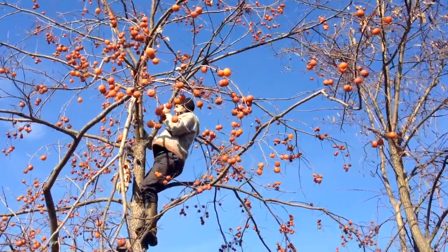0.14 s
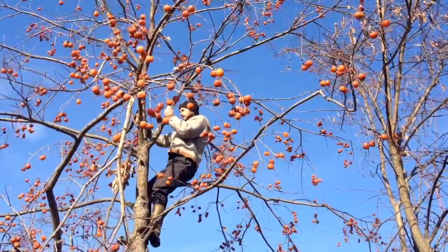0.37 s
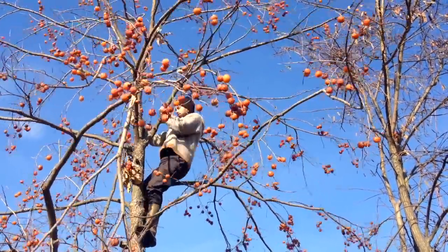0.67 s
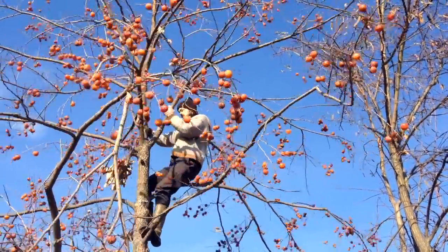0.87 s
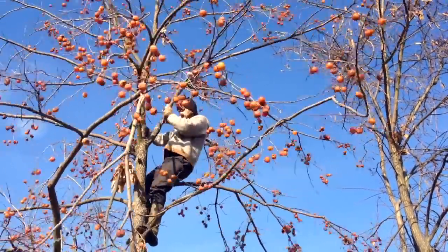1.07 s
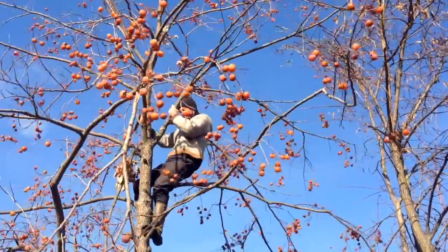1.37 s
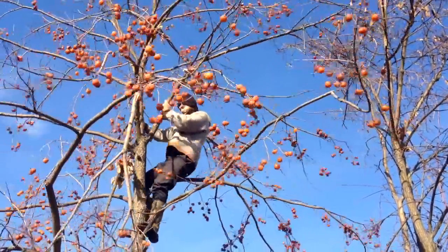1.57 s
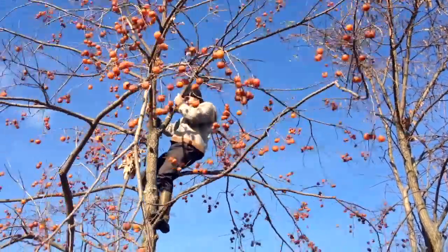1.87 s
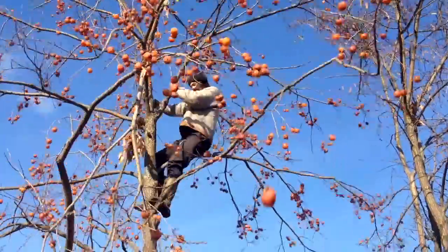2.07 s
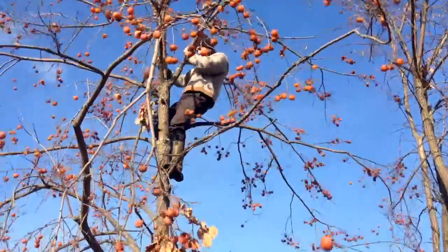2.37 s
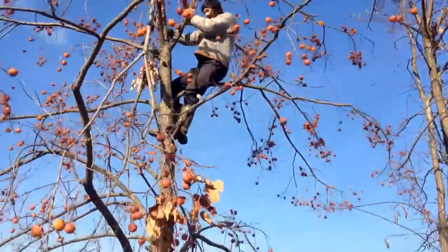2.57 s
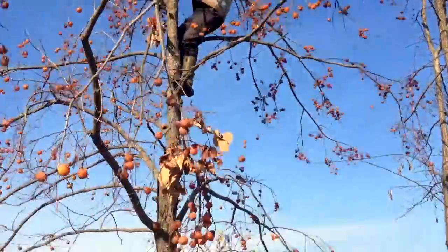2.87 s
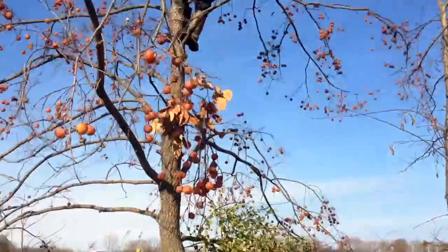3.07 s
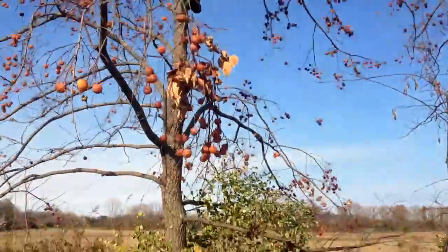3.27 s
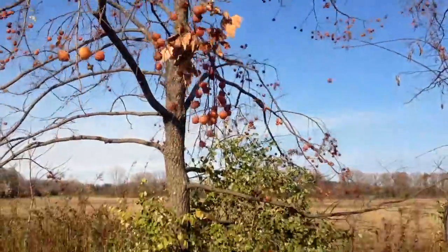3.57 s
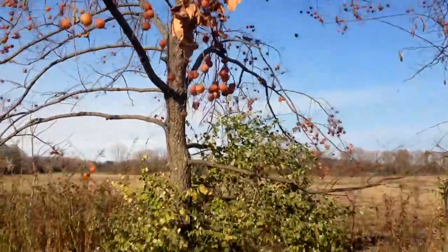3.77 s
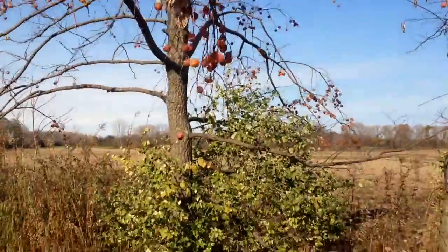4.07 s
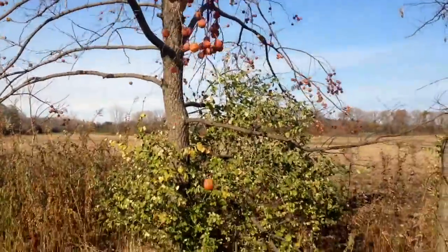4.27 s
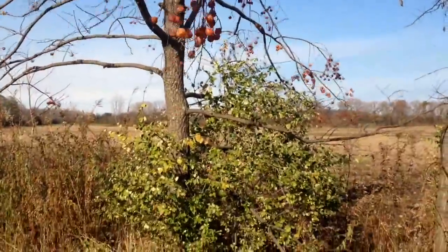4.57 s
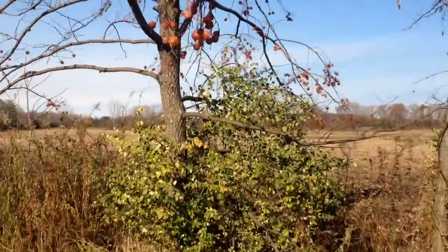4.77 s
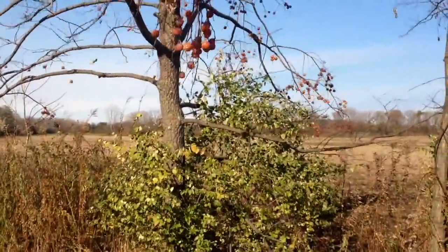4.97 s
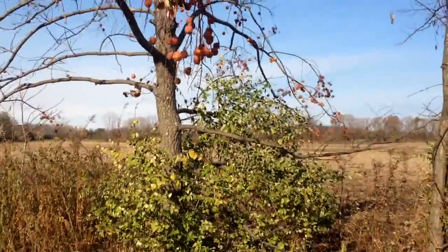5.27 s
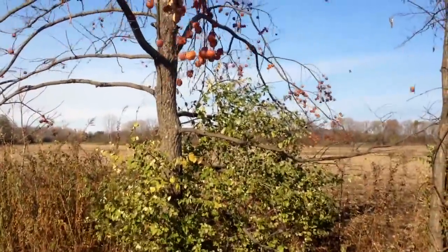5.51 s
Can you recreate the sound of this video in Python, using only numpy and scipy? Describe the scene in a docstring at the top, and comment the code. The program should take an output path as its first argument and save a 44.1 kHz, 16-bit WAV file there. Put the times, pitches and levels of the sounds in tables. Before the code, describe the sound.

Outdoors on open farmland, a faint low breeze, then a climber shakes a fruit tree: dry leaves rustle and twigs snap. From about two seconds fruit falls thickly, with crisp crunches in brittle leaf litter, soft thuds on soil and a few woody knocks on branches. Near the end one fruit bounces on something hollow, which rings low and rattles. Single close microphone, mono, dry, no echo.

```python
"""Shaking a fruit tree

Leaves rustle as a flutter of tiny random snaps, over a low breeze made of filtered noise.
Dry twigs snap and falling fruit crunches into brittle litter: short bursts of the same kind of snaps.
Low thumps (short sinking tones) are first a boot on the trunk or a puff of wind, later fruit on soil.
Bark scrapes (rough sliding tones) and branches ring (fading tones). Near the end one fruit bounces
on something hollow, which rings in low tones and rattles."""
import sys
import numpy as np
from scipy import signal
from scipy.fft import rfft, irfft, next_fast_len
from scipy.io import wavfile
from scipy.ndimage import uniform_filter1d, map_coordinates

SR = 44100
rng = np.random.default_rng(int(sys.argv[2]) if len(sys.argv) > 2 else 0)


def dump_mix(stems):
    """Bounce the given channels to the path in sys.argv[1] as a 16-bit WAV at rate SR."""
    frames = np.atleast_2d(stems).T  # one column per channel
    limited = np.clip(frames, -1, 1)  # hard clip at full scale
    pcm = np.round(limited * 32767).astype(np.int16)
    wavfile.write(sys.argv[1], SR, pcm)


N = 248801


def amp(db):
    """Turn decibels into a gain."""
    return 10 ** (np.asarray(db) / 20)


def unit(x):
    """Scale a sound to an rms level of 1."""
    return x / np.sqrt(np.mean(x ** 2) + 1e-20)


def curves(rows):
    """Join table points with straight lines: one curve for each column after the time."""
    s, *cols = np.transpose(rows)
    return [np.interp(np.arange(N) / SR, s, c) for c in cols]


def wobble(rate):
    """Draw a smooth random curve with this many random points a second."""
    points = rng.standard_normal(int(N * rate / SR) + 4)
    return map_coordinates(points, [np.arange(N) * rate / SR])


def filtered(x, response):
    """Multiply the spectrum of x by a response that depends on frequency."""
    m = next_fast_len(N + SR // 2)
    return irfft(rfft(x, m) * response(np.fft.rfftfreq(m, 1 / SR)), m)[..., :N]


def coloured(x, points):
    """Give x the tone colour of (f/Hz, gain/dB) points, with a filter that never acts ahead of time."""
    f, db = np.transpose(points)
    hz = np.fft.rfftfreq(4096, 1 / SR)
    gain = amp(np.interp(np.log(hz + 1), np.log(f), db))
    # folding the cepstrum (the spectrum of the log gain) forward gives minimum phase
    cep = irfft(np.log(gain))
    cep[1:2048] *= 2
    cep[2049:] = 0
    return signal.fftconvolve(x, irfft(np.exp(rfft(cep))))[:N]


def patchy(x, depth_db):
    """Raise and lower random patches, about 1 kHz by 17 ms: different leaves at each moment."""
    z = signal.stft(x, nperseg=128)[2]
    field = uniform_filter1d(rng.standard_normal(z.shape), size=3, axis=0)
    field = uniform_filter1d(field, size=12, axis=1)
    patched = signal.istft(z * amp(depth_db * unit(field)), nperseg=128)[1][:N]
    return unit(patched) * x.std()


FALL_FROM_S, FALL_FULL_S = 0.52, 2.38  # fruit starts to come down, and comes down fully


def with_fall(before, during):
    """Move from one value to another as the fall of fruit builds up."""
    return np.interp(np.arange(N) / SR, [FALL_FROM_S, FALL_FULL_S], [before, during])


# tone colour of dry leaves as heard through the microphone, whose port rings near 4.7 kHz:
# f/Hz, level/dB (per Hz)
LEAVES_THROUGH_PORT = [(290, -32), (500, -10), (1230, -5), (1900, -3), (2460, -3.5), (3180, -10.5),
                       (3900, -7), (4420, -0.5), (4700, 2), (5050, -3), (5900, -2.5), (6800, -5.5),
                       (8400, -2), (9800, -7.5), (10800, -6.5), (12200, -4), (14700, -5.5), (15500, -1)]
# the dull, middle and two fine parts of the leaf sound: from f/Hz, to f/Hz
LEAF_PARTS = [(0, 3200), (3200, 6400), (6400, 9800), (9800, 20000)]


def crackle(per_s, spread_db, hiss, shared):
    """Tiny snaps of uneven size on a bed of hiss; each part has its own snaps and some in common."""
    sizes = amp(spread_db * rng.exponential(size=(5, N)).clip(0, 4))
    snaps = (rng.random((5, N)) < per_s / SR) * sizes ** 2
    mixed = shared * snaps[:1] + snaps[1:]  # row 0 is common to all parts
    life = np.exp(-np.arange(88) / (SR * 0.00029))  # the power of a snap dies away in 0.29 ms
    power = signal.fftconvolve(mixed, life[None], axes=1)[:, :N].clip(0)
    grains = np.sqrt(power / power.mean() + hiss ** 2) * rng.standard_normal((4, N))

    def below(hz, edge):
        return 1 / (1 + (hz / (edge + 1)) ** 8)

    parts = np.array([
        filtered(coloured(grain, LEAVES_THROUGH_PORT),
                 lambda hz: np.sqrt(below(hz, hi) * (1 - below(hz, lo))))
        for grain, (lo, hi) in zip(grains, LEAF_PARTS)])
    return parts / parts.sum(axis=0).std()


def ticks(count, cycles):
    """Single stiff leaves flicked by a twig: short tones of scattered pitch, fading over a few cycles."""
    at = (rng.random(count) * N).astype(int)[:, None]
    size, pitch = rng.exponential(size=count).clip(0, 4)[:, None], rng.standard_normal(count)
    hz = (5200 * np.exp(.45 * pitch)).clip(1900, 14000)[:, None]
    k = np.arange(160)  # samples since the flick
    tones = amp(1.3 * size) * np.exp(-k * hz / (SR * cycles)) * np.sin(2 * np.pi * hz * k / SR)
    together = np.bincount((at + k).ravel(), tones.ravel())[:N]
    return unit(coloured(together, LEAVES_THROUGH_PORT))


HARD_DB, DULL_PER_DB = -35, -0.35  # rustle of hard shaking; each dB gentler lifts the dull part this much
DULL_DB, FINE_DB = (-3, 0.5), (-4.5, 0)  # dull and fine parts of the rustle: (before, during the full fall)
# how hard the tree is shaken: t/s, rustle level/dB before the flutter
SHAKING = [(0.0, -54.5), (0.3, -55.5), (0.36, -45.5), (0.56, -44.5), (0.67, -37), (0.8, -35), (1.08, -33.5),
           (1.87, -35), (2.15, -33), (2.48, -36), (3.3, -31), (3.6, -34.5), (3.85, -30), (4.18, -37),
           (4.43, -35.5), (4.6, -30.5), (4.87, -36), (5.29, -33.5), (5.64, -36)]


def rustle():
    """Shaken twigs drag dry leaves over each other; the sound flutters quickly."""
    level_db, = curves(SHAKING)
    dull_db = with_fall(*DULL_DB) + DULL_PER_DB * (level_db - HARD_DB)
    fine_db = with_fall(*FINE_DB)
    flutter_db = 0.41 * wobble(30) + 0.39 * wobble(110).clip(-1.5, 1.5)
    sway_db = 2.0 * np.array([wobble(rate) for rate in (25.02, 35, 24.94, 22)])
    burst_db = 0.82 * np.array([wobble(120).clip(0, 2) ** 2 for _ in LEAF_PARTS])
    parts_db = sway_db + burst_db + [dull_db, 0 * dull_db, fine_db, fine_db]
    bed = (amp(parts_db) * crackle(500, spread_db=4.0, hiss=1.6, shared=0.48)).sum(axis=0)
    flicks = amp(-19.5) * ticks(count=2500, cycles=3.7)
    return amp(level_db + flutter_db) * (patchy(bed, depth_db=0.77) + flicks)


PATTER_DB = (-59, -52)  # far fruit on the soil: (before, during the full fall)
# strength of the breeze: t/s, rumble level/dB
BREEZE_LEVEL = [(0, -53), (.52, -55.5), (.75, -52), (1.3, -54.5), (1.8, -56.5), (2.17, -53), (2.7, -50),
                (3.0, -58), (4.3, -73), (5.64, -64)]
# tone colour of the breeze: f/Hz, level/dB (per Hz)
RUMBLE_COLOUR = [(20, 3), (70, -7), (120, -0.5), (160, -1.5), (230, -8.5), (340, -53.5)]
# tone colour of far fruit on soil: f/Hz, level/dB (per Hz)
PATTER_COLOUR = [(60, -50.5), (130, -0.5), (300, -3), (500, -7), (900, -6.5), (1600, -24.5)]


def ground():
    """Lumpy breeze on the microphone port, and far fruit too many to tell apart: both filtered noise."""
    rumble_db, = curves(BREEZE_LEVEL)
    rumble = unit(amp(4.5 * wobble(15)) * coloured(rng.standard_normal(N), RUMBLE_COLOUR))
    sizes = amp(2.1 * rng.exponential(size=N).clip(0, 3)) * rng.standard_normal(N)
    drops = (rng.random(N) < 400 / SR) * sizes  # about 400 a second
    patter = unit(coloured(unit(drops) + 1.0 * rng.standard_normal(N), PATTER_COLOUR))
    return amp(rumble_db) * rumble + amp(with_fall(*PATTER_DB)) * patter


SMALL_DB, SMALL_SPREAD_DB, SMALL_S = -45.5, -11, 0.027  # lesser crunches: level, scatter, usual length
SMALL_FINE_DB = -6  # their usual fine part


def lesser(count):
    """Small crunches at chance moments of the full fall, as rows like those of the crunch table."""
    at = rng.uniform(FALL_FULL_S, N / SR, count)
    size, span, dull = rng.standard_normal((count, 3)).clip(-2, 2).T
    level_db, length = SMALL_DB + SMALL_SPREAD_DB * size, SMALL_S * np.exp(.6 * span)
    return np.c_[at, level_db, length, 4 * dull, SMALL_FINE_DB - 2.5 * dull]


TWIG_DULL_DB, TWIG_FINE_DB = -11, -10  # twigs are heard mostly in the middle of the range
SNAP_DB, SNAP_S = 0, 0.00058  # first brittle break: usual level over the burst before fading with length, life
# dry twigs snapping: t/s, level/dB, length/s
TWIG_SNAPS = [(0.54, -29, 0.0043), (0.589, -26, 0.0026), (0.651, -30.5, 0.008), (0.696, -29.5, 0.0072),
              (0.713, -28.5, 0.012), (0.761, -31, 0.012), (0.842, -37, 0.0034), (0.865, -29, 0.049),
              (1.272, -23, 0.0029), (1.275, -30.5, 0.051), (1.451, -26.5, 0.017), (1.515, -28, 0.0047),
              (1.595, -26, 0.0055), (1.758, -28.5, 0.041), (1.815, -29, 0.0088), (2.043, -29, 0.004),
              (2.955, -24.5, 0.014), (3.3087, -20.5, 0.019), (3.404, -20, 0.0026), (3.535, -26, 0.038),
              (4.658, -19.5, 0.0026)]
# fruit breaking through dry leaves, and last the crack as the fruit strikes the hollow thing: # t/s, level/dB,
# length/s, dull part level/dB, fine part level/dB # (part levels are relative to the middle; the two fine parts
# are then spread around theirs)
FRUIT_CRUNCHES = [(0.77, -41.5, 0.016, 8, -2), (0.936, -28.5, 0.049, -5, -2.5), (1.102, -49, 0.06, 21, -2),
                  (1.555, -32.5, 0.043, 0, -4), (1.611, -33.5, 0.042, 3, -1), (1.9312, -21, 0.0073, -1, -4),
                  (1.9862, -38.5, 0.0092, 16, -2), (2.0285, -30, 0.0025, -3, 3),
                  (2.104, -28.5, 0.0034, 6.5, 1), (2.1567, -27.5, 0.0028, -2, 3),
                  (2.1665, -29, 0.0094, 3, -5), (2.2285, -31, 0.028, 0, 4), (2.243, -26.5, 0.024, 2.5, -5),
                  (2.286, -18, 0.013, 0.5, 0), (2.2955, -26, 0.0016, -2, -4), (2.3308, -26.5, 0.004, 2, 2),
                  (2.382, -36.5, 0.0071, 11, -1), (2.423, -26.5, 0.015, 5.5, -2.5),
                  (2.443, -36, 0.0087, -7, 6), (2.509, -36.5, 0.029, 1, 4), (2.5509, -17.5, 0.005, 2, 2),
                  (2.6606, -44, 0.006, -11, 9), (2.6756, -28.5, 0.015, 4, 2.5),
                  (2.7614, -24, 0.0047, 7, 2.5), (2.7818, -26, 0.0074, 5, 4.5),
                  (2.8098, -28, 0.0035, 6.5, 5), (2.852, -26.5, 0.037, 3, 3), (2.9869, -25, 0.004, 3, 2.5),
                  (3.0542, -24, 0.0064, -1, 1), (3.1435, -31, 0.0078, 10, 2), (3.156, -25, 0.012, -2, 1),
                  (3.171, -25.5, 0.015, -0.5, 1), (3.226, -27.5, 0.046, -1.5, -1),
                  (3.3395, -23, 0.0019, 8.5, 4), (3.464, -26.5, 0.016, 6.5, -2),
                  (3.477, -25.5, 0.0036, -17, -2), (3.5152, -20.5, 0.017, -1, -10),
                  (3.668, -29, 0.022, 3.5, -3.5), (3.7035, -28, 0.0024, -12, -2),
                  (3.711, -30.5, 0.0029, 10, -3), (3.7855, -29.5, 0.0089, 7.5, 4.5),
                  (3.8559, -23.5, 0.017, 2, -1), (3.9625, -35.5, 0.013, 7, 1),
                  (4.0044, -30.5, 0.039, 8, 2.5), (4.01, -25.5, 0.013, 0, -1), (4.128, -34, 0.021, 7, 5),
                  (4.1437, -26, 0.021, -7, -2), (4.1946, -28.5, 0.0031, 11.5, 9.5),
                  (4.3548, -20.5, 0.0064, -1.5, -0.5), (4.467, -36, 0.012, 5, 3.5),
                  (4.518, -39.5, 0.036, 8, 11.5), (4.591, -36, 0.045, 4, -6), (4.5992, -33, 0.004, -4, 9.5),
                  (4.6623, -33.5, 0.019, 8.5, -10), (4.736, -33.5, 0.018, -8, 6),
                  (4.8065, -29.5, 0.0066, 7.5, 2.5), (4.826, -36, 0.0016, 14, -3),
                  (4.937, -29, 0.027, -3, -1.5), (4.9925, -22.5, 0.0066, 1, 0),
                  (5.048, -26, 0.037, -2, -2.5), (5.1045, -27.5, 0.058, 4.5, 0.5),
                  (5.137, -32, 0.004, 4, -8), (5.2033, -30.5, 0.0072, 1.5, 1.5),
                  (5.2912, -29.5, 0.0057, 7, 6), (5.434, -30.5, 0.023, 0, -2), (5.466, -31, 0.038, 2, 3),
                  (5.5006, -14.5, 0.0038, 5.5, -7.5)]


def crunches():
    """Each fruit or twig sets off a burst of snaps that stops when it has passed, then a short settling."""
    shapes, t = np.zeros((4, N + SR)), np.arange(SR // 8) / SR
    fruit = [*FRUIT_CRUNCHES, *lesser(count=24)]
    twigs = [(*row, TWIG_DULL_DB, TWIG_FINE_DB) for row in TWIG_SNAPS]
    for s, db, length, dull_db, fine_db in fruit + twigs:
        rise = 0.00034 + 6.5 * length ** 2  # a longer path through the leaves starts more gently
        passing = (1 - np.exp(-t / rise)) * np.exp(-.3 * t / length) / (1 + (t / length) ** 6)
        settling = amp(-5.5) * (1 - np.exp(-t / 0.0078)) * np.exp(-t / 0.014)
        # the first break is weaker in a long crunch
        snap = amp(SNAP_DB + rng.normal(0, 4, (4, 1))) * np.exp(-t / SNAP_S - length / 0.011)
        finest_db = 1.2 * fine_db - 1.5 + rng.normal(0, 1.5)
        parts_db = np.c_[[dull_db, 0, fine_db + 1.5, finest_db]]
        shapes[:, round(s * SR):][:, :len(t)] += amp(db + parts_db) * (passing + settling + snap)
    parts = crackle(1000, spread_db=2.0, hiss=1.35, shared=1.3)
    return sum(shape[:N] * patchy(part, depth_db=2.0) for shape, part in zip(shapes, parts))


FAINT_DB, FAINT_HZ = -37.5, 300  # the fainter thuds: usual peak and pitch


def fainter(count):
    """Fainter thuds at chance moments of the full fall, as rows like those of the thump table."""
    at = rng.uniform(FALL_FULL_S, N / SR, count)
    size, pitch = rng.standard_normal((count, 2)).T
    return np.c_[at, FAINT_DB + 2.2 * size, FAINT_HZ * np.exp(.25 * pitch)]


# low thumps: early ones a boot on the trunk or a puff of wind, later ones fruit on soil:
# t/s, peak level/dB of the thump without its tail, nominal f/Hz (the pitch sinks through it)
LOW_THUMPS = [(0.6972, -35.5, 154), (0.722, -40, 153), (0.8682, -33.5, 156), (0.99, -43, 158),
              (1.573, -39, 300), (1.8035, -34, 146), (1.9383, -30.5, 326), (2.0014, -33, 490),
              (2.125, -35, 343), (2.172, -32, 407), (2.262, -33, 258), (2.4313, -27.5, 330),
              (2.472, -38, 240), (2.514, -38, 260), (2.553, -33, 370), (2.678, -27, 376),
              (2.7658, -27.5, 338), (2.7913, -33, 265), (2.8149, -41, 270), (2.849, -33.5, 243),
              (2.876, -35, 326), (2.9578, -33, 372), (3.0376, -31, 560), (3.114, -31.5, 269),
              (3.135, -29.5, 352), (3.1606, -27, 340), (3.3455, -28.5, 310), (3.367, -31.5, 253),
              (3.4798, -27.5, 325), (3.5217, -26.5, 390), (3.7143, -28, 348), (3.865, -34, 350),
              (3.882, -33, 380), (3.898, -33, 241), (3.9688, -35, 373), (4.0163, -27.5, 318),
              (4.028, -37, 332), (4.055, -37, 260), (4.139, -37, 298), (4.1525, -32.5, 270),
              (4.1989, -27.5, 306), (4.362, -37, 400), (4.4686, -31.5, 360), (4.559, -35, 310),
              (4.603, -37, 230), (4.6794, -33.5, 460), (4.9162, -25.5, 343), (4.9986, -37, 296),
              (5.0942, -36, 255), (5.132, -30, 255), (5.2196, -35, 268)]


def thuds():
    """A soft, short thud whose pitch sinks quickly, then a lumpy low tail."""
    out = np.zeros(N + SR)
    for s, db, hz in [*LOW_THUMPS, *fainter(count=30)]:
        u = np.arange(round(16 * SR / hz)) * hz / SR  # time in cycles
        phase = 2 * np.pi * (0.65 * u + 0.42 * (1 - np.exp(-u / 0.6)))
        fade = 0.63 * np.exp(rng.normal(0, 0.22))
        weight = (1 - np.exp(-u / 0.33)) * np.exp(-u / fade)
        swing = np.sin(phase)
        thump = weight * (swing - np.average(swing, weights=weight))  # ups and downs cancel out
        lumps = np.interp(u, np.arange(18), rng.standard_normal(18))
        tail_shape = amp(-16.5) * (1 - np.exp(-u / 1.9)) * np.exp(-u / 3.9)
        tail = tail_shape * lumps * np.sin(2 * np.pi * 0.763 * u)
        start = round((s - .55 / hz) * SR)  # a little early, as the thump takes time to build
        out[start:][:len(u)] += amp(db) * (thump + tail) / np.abs(thump).max()
    return out[:N]


# bark scraped by a boot or a limb, or fruit rolling: t/s, level/dB, length/s, first f/Hz, last f/Hz
BARK_SCRAPES = [(1.11, -39, 0.022, 1790, 1720), (1.16, -34, 0.013, 1750, 1720),
                (1.553, -38, 0.012, 1480, 1290), (1.554, -39.5, 0.018, 910, 453),
                (4.47, -41, 0.094, 401, 516)]


def scrapes():
    """A narrow, rough tone whose pitch slides while the contact moves."""
    out = np.zeros(N)
    for s, db, length, first_hz, last_hz in BARK_SCRAPES:
        u = np.linspace(0, 1, round(length * SR))
        rough = unit(uniform_filter1d(rng.standard_normal(SR // 8), size=200))[:len(u)]
        tone = np.sin(2 * np.pi * np.cumsum(first_hz * (last_hz / first_hz) ** u) / SR)
        out[round(s * SR):][:len(u)] += amp(db) * np.sin(np.pi * u) ** .5 * rough * tone
    return out


# fruit glancing off a branch: t/s, level/dB before the modes add up, ring of the wood f/Hz
BRANCH_TAPS = [(2.762, -20.5, 1805), (3.1477, -31, 2350), (3.471, -17.5, 1920), (4.1951, -21, 1610),
               (4.592, -22.5, 1820), (4.9934, -20.5, 1970)]
# modes (separate tones) of a branch: multiple of its ring, level/dB
BRANCH_MODES = [(0.62, -23), (1.0, -4), (1.17, -7)]


def taps():
    """A dry branch rings briefly in a few tones, falling by 60 dB in 40 ms."""
    out, t = np.zeros(N + SR), np.arange(SR // 20) / SR
    for s, db, hz in BRANCH_TAPS:
        modes = sum(amp(level) * np.sin(2 * np.pi * hz * ratio * t) for ratio, level in BRANCH_MODES)
        out[round(s * SR):][:len(t)] += amp(db - 60 * t / 0.04) * modes
    return out[:N]


# the fruit bouncing on the hollow thing: t/s, level/dB, rattle level/dB relative to it
BOUNCES = [(5.481, -36, -8), (5.492, -31, -15), (5.5002, -23, -2.5), (5.5098, -18, -20.5)]
# modes (separate tones) of the hollow thing: f/Hz, level/dB, time to fall by 60 dB/s
HOLLOW_MODES = [(178.6, -8.5, 0.21), (241, -8, 0.43), (248, -13, 0.45), (279, 7.5, 0.06), (297, -23, 0.55),
                (414, -12.5, 0.12), (637, -22, 0.22), (900, -11, 0.13)]
# tone colour of its loose walls: f/Hz, level/dB (per Hz)
RATTLE_COLOUR = [(250, -18), (450, -1), (1100, 1.5), (1500, 0.5), (2100, -4), (3000, -3), (6000, -64)]


def hollow():
    """Blows ring the low modes of a hollow vessel; the ring wavers and its loose walls chatter briefly."""
    ring, shake, t = np.zeros(N + SR), np.zeros(N + SR), np.arange(SR // 2) / SR
    sag = t + 0.0013 * (1 - np.exp(-t / 0.018))  # stretched walls ring a little sharp at first
    for s, db, rattle_db in BOUNCES:
        modes = sum(amp(level - 60 * t / t60) * np.sin(2 * np.pi * hz * sag)
                    for hz, level, t60 in HOLLOW_MODES)
        ring[round(s * SR):][:len(t)] += amp(db) * modes * (1 - np.exp(-t / 0.0022))
        shake[round(s * SR):][:len(t)] += amp(db + rattle_db - 60 * t / 0.18)
    chatter = unit(amp(2.2 * wobble(450)) * rng.standard_normal(N))
    rattle = shake[:N] * unit(coloured(chatter, RATTLE_COLOUR))
    return amp(0.8 * wobble(39)) * ring[:N] + rattle


def scene():
    """Add all sources together; one microphone feeds both channels."""
    mix = rustle() + ground() + crunches() + thuds() + scrapes() + taps() + hollow()
    return np.tile(mix, (2, 1))


TOP_HZ = 15310  # the sound stops steeply above this frequency


def record(dry):
    """Deep bass is cut, and almost nothing is left above TOP_HZ."""
    lean = signal.sosfilt(signal.butter(3, 95, "highpass", fs=SR, output="sos"), dry)
    return filtered(lean, lambda hz: 1 / (1 + (hz / TOP_HZ) ** 700))


dry = scene()
out = record(dry)
dump_mix(out)
```